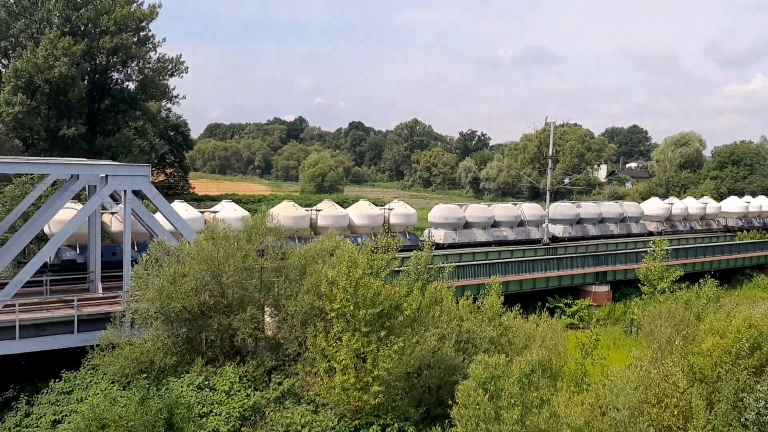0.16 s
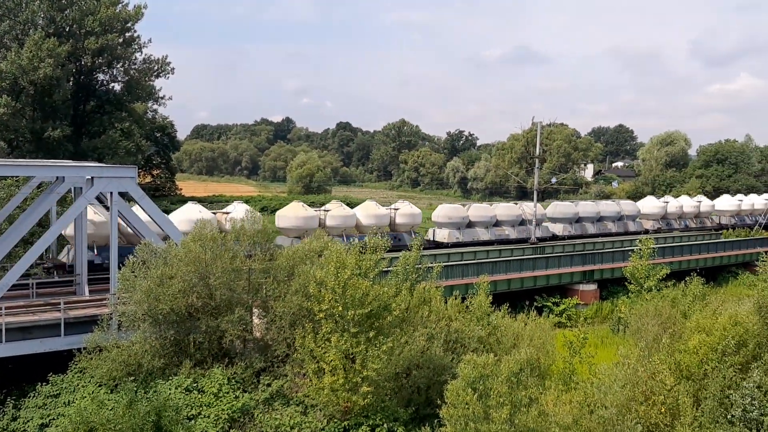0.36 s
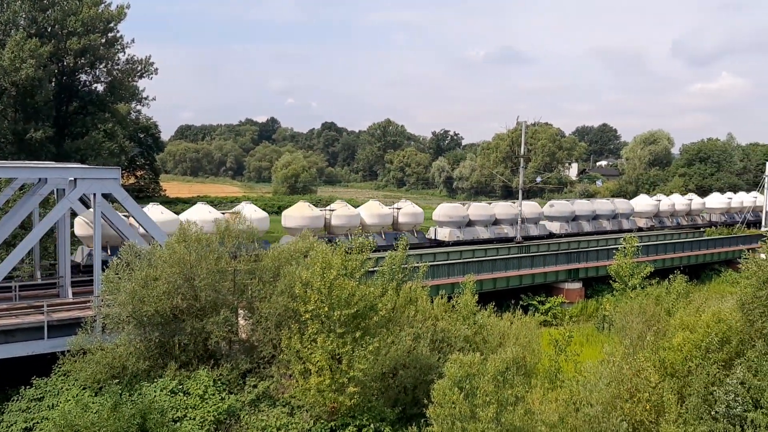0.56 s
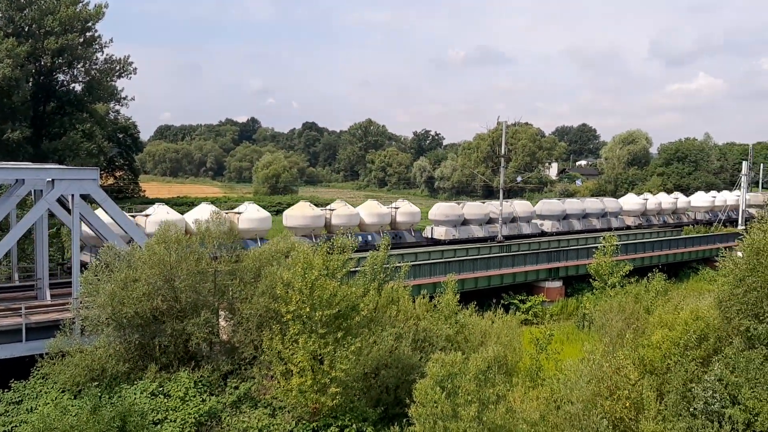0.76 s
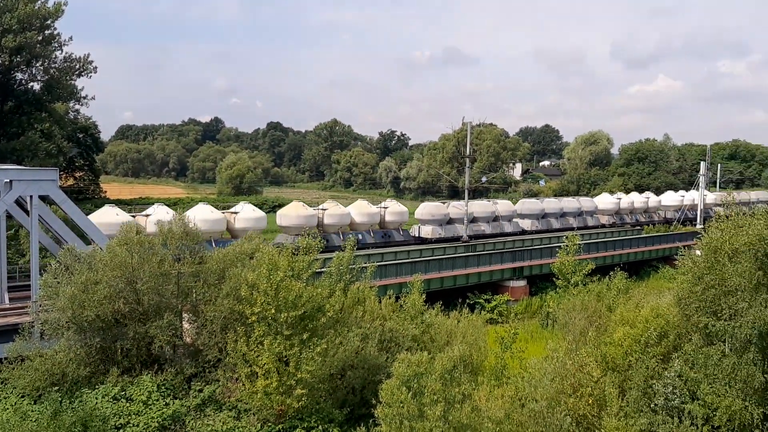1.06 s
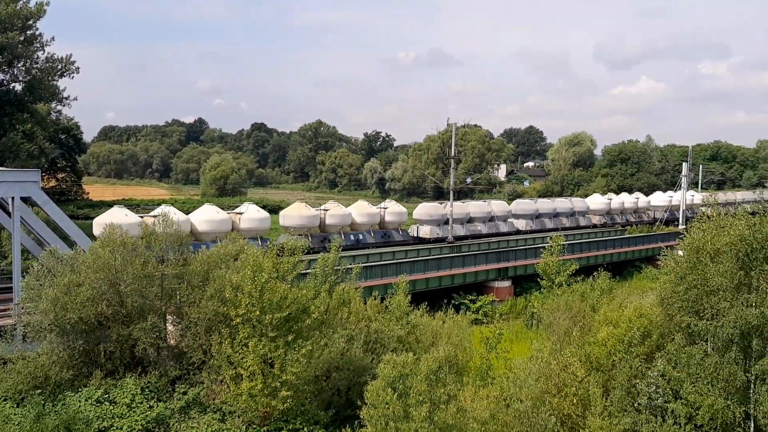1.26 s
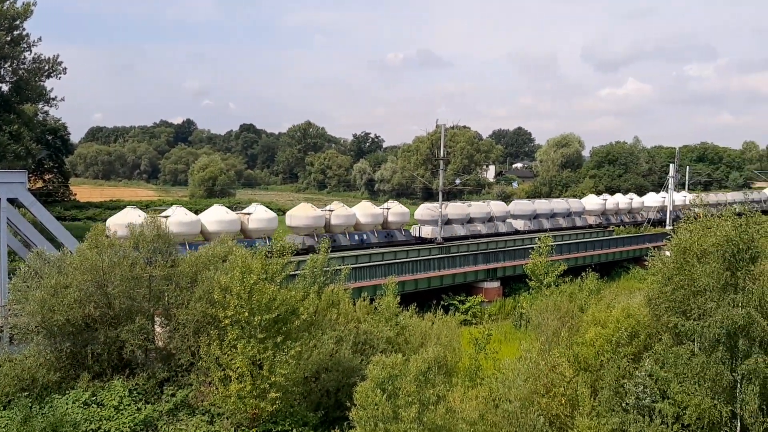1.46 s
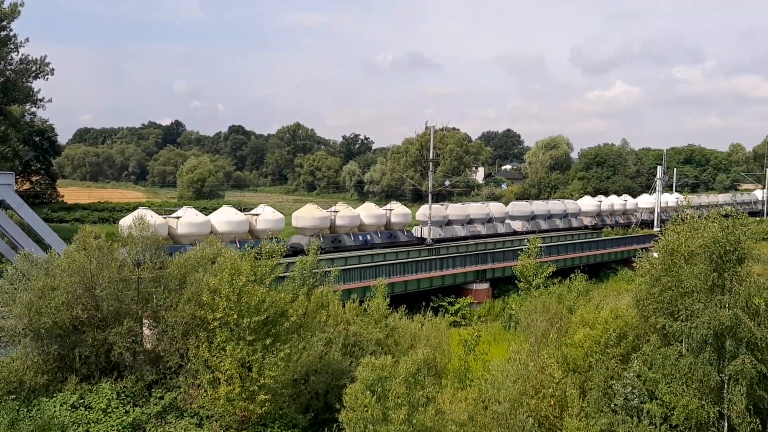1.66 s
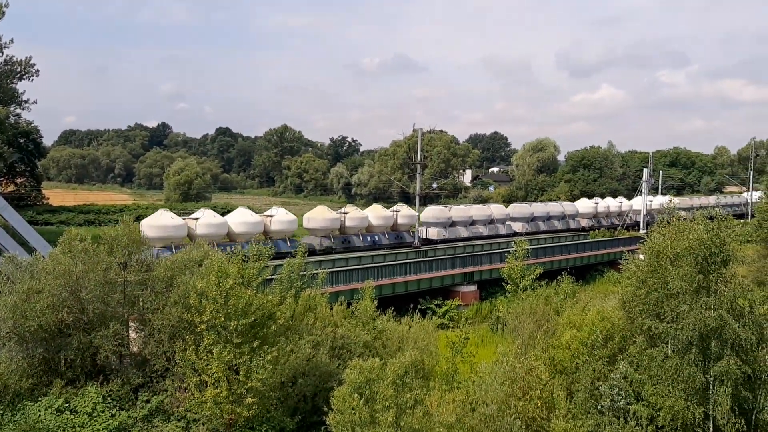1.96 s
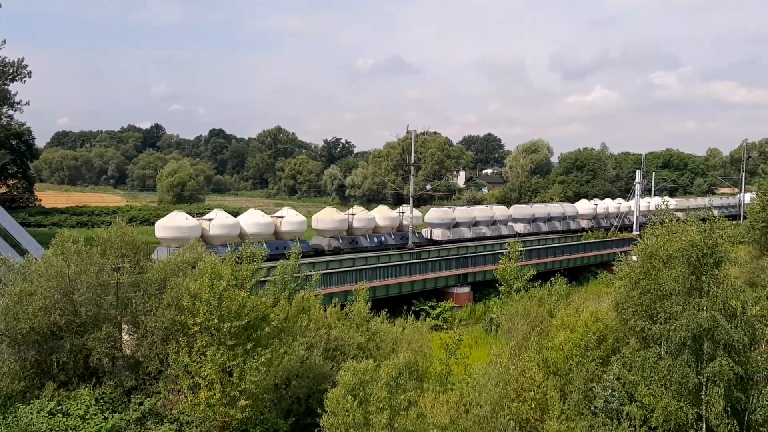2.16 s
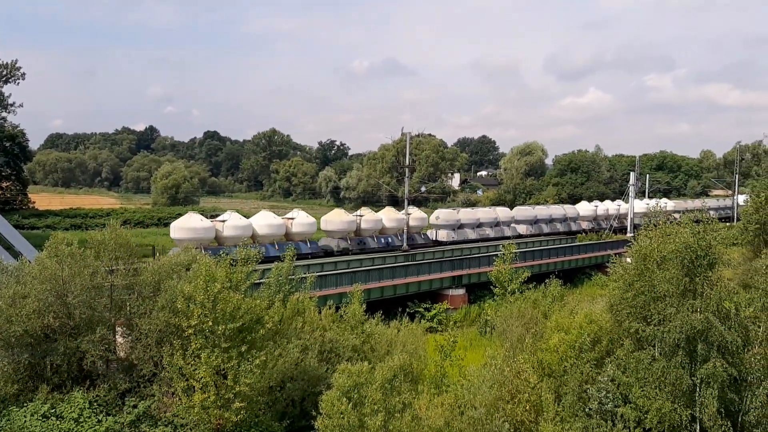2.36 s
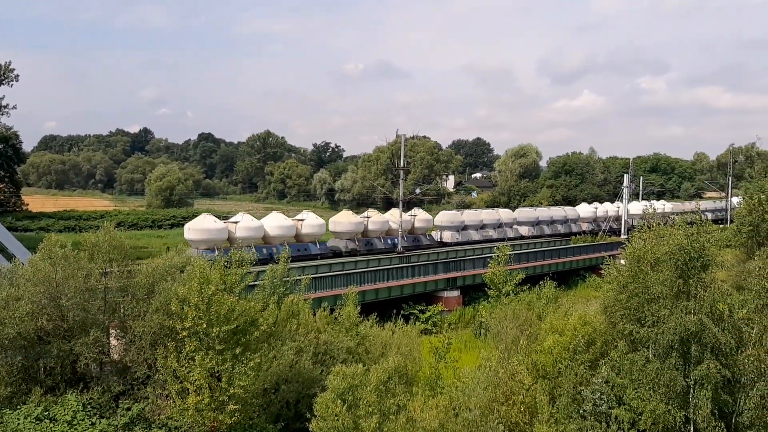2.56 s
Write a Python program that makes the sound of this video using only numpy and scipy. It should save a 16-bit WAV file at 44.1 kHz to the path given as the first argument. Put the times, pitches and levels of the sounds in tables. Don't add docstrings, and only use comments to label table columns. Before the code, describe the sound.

Freight train wheels squeal piercingly and steadily over low bridge drumming that fades as wagons recede

```python
import sys
import numpy as np
from scipy import signal
from scipy.fft import rfft, irfft, next_fast_len
from scipy.io import wavfile
from scipy.ndimage import uniform_filter1d, minimum_filter1d, map_coordinates

SR = 44100
rng = np.random.default_rng(int(sys.argv[2]) if len(sys.argv) > 2 else 0)


def amplitude_ratio(level_db):
    exponent = np.asarray(level_db, float) / 20
    return 10 ** exponent


def unload_audio(sound):
    columns = np.transpose(np.atleast_2d(sound))
    steps = np.round(np.clip(columns, -1, 1) * 32767)
    wavfile.write(sys.argv[1], SR, steps.astype(np.int16))


N = 119070

LAG_S = 0.000463
NEAR_PORT_DB = 5
WAVER_HZ = 4.6

# t/s, level/dB
BRIDGE_FADE = [(0, -27.5), (.45, -29), (.72, -31), (.92, -27), (1.15, -32.5), (2.0, -35.5), (2.7, -38.5)]
HALO_SHIFT = [-20, 18]


def unit(x):
    return x / np.sqrt(np.mean(x ** 2) + 1e-20)


def along(points, hz):
    f, v = np.transpose(points)
    return np.interp(np.log(hz + 1), np.log(f + 1), v)


def closed(points, hz):
    inside = (hz > 0.9 * points[0][0]) * (hz < 1.05 * points[-1][0])
    return amplitude_ratio(along(points, hz)) * inside


def peaks(modes, hz):
    power = sum(amplitude_ratio(2 * db) / (1 + (2 * (hz - centre) / width) ** 2) for centre, width, db in modes)
    return np.sqrt(1 + power)


def curves(rows):
    s, *cols = np.transpose(rows)
    return [np.interp(np.arange(N) / SR, s, c) for c in cols]


def wobble(rate):
    coarse = np.arange(0, N + 32, 32)
    knots = rng.standard_normal(600)
    return np.interp(np.arange(N), coarse, map_coordinates(knots, [coarse * min(rate, 200) / SR]))


def gate(start_s, length_s):
    t = np.arange(N) / SR
    return np.clip(np.minimum(t - start_s, start_s + length_s - t) / 0.05, 0, 1)


def filtered(x, response):
    m = next_fast_len(N + SR // 2)
    return irfft(rfft(x, m) * response(np.fft.rfftfreq(m, 1 / SR)), m)[..., :N]


def rush(gain, patchy_db, lag_s=LAG_S, alike=None):
    # f/Hz, likeness
    wheel_alike = [(60, 0.99), (300, 1), (600, 0.58), (1200, 0.62), (2700, 0.35), (4500, 0.25),
                   (8000, 0.15), (15000, 0.23)]
    # f/Hz, level/dB
    left_port = [(60, -2.3), (1800, -3), (3100, -5), (3500, -9), (4000, -3), (5700, -14), (7200, -5.5),
                 (15000, -3)]
    if alike is None:
        alike = wheel_alike

    z = signal.stft(rng.standard_normal((2, N)), nperseg=512)[2]
    patches = uniform_filter1d(rng.standard_normal(z.shape[1:]), size=4, axis=0)
    patches = unit(uniform_filter1d(patches, size=10, axis=1))
    pair = signal.istft(z * amplitude_ratio(patchy_db * patches), nperseg=512)[1][:, :N]

    def shared_and_opposed(hz):
        turn = np.arccos(np.clip(along(alike, hz), -1, 1)) / 2
        return gain(hz) * np.array([np.cos(turn), np.sin(turn)])

    def path_to_left(hz):
        return amplitude_ratio(along(left_port, hz)) * np.exp(-2j * np.pi * hz * lag_s)

    shared, opposed = filtered(pair, shared_and_opposed)
    both = np.array([filtered(shared + opposed, path_to_left), shared - opposed])
    return both / np.std(both.mean(axis=0))


def bridge():
    # f/Hz, level/dB per Hz
    girders = [(15, -68), (25, -24), (45, -21), (65, -3), (140, -2), (187, -1), (412, -3.5), (652, -8.5),
               (1100, -6.5), (1430, -18), (2420, -120)]
    # f/Hz, width/Hz, level/dB
    girder_modes = [(66, 16, 5.5), (128, 47, 5), (225, 23, 1), (442, 130, 3.5)]
    # f/Hz, likeness
    bridge_alike = [(60, 0.97), (300, 0.96), (500, 1), (750, -0.024), (1200, -0.85)]
    level_db, = curves(BRIDGE_FADE)
    drumming = rush(lambda hz: closed(girders, hz) * peaks(girder_modes, hz),
                    patchy_db=1.17, lag_s=-0.00018, alike=bridge_alike)
    return amplitude_ratio(level_db + 0.13 * wobble(5.5)) * drumming


def hums():
    # t/s, length/s, f/Hz, level/dB
    plates = [
        (0, 0.77, 63.5, -39.5),
        (-.05, 0.21, 135.5, -37),
        (0.072, 0.16, 223.7, -38),
        (0.323, .1, 108, -34),
        (0.754, 0.28, 65, -44),
        (.95, 0.34, 115.3, -39.5),
        (1.328, .12, 100, -36),
        (1.456, 0.19, 118, -37.5),
        (1.795, 0.11, 130, -38),
        (2.117, 0.31, 71.8, -44),
    ]
    drift_hz = 2.7 * wobble(9.18)
    notes = sum(amplitude_ratio(db) * gate(s, length_s) * np.sin(2 * np.pi * np.cumsum(hz + drift_hz) / SR)
                for s, length_s, hz, db in plates)
    return np.sqrt(2) * notes * amplitude_ratio([[-1.2], [1.2]])


def joints():
    # t/s, peak/dB, f/Hz
    knocks = [
        (0.023, -17, 412),
        (0.19, -17, 330),
        (0.279, -18, 445),
        (0.402, -10.5, 390),
        (0.627, -15.5, 424),
        (0.764, -17, 377),
        (0.888, -33, 294),
        (1.029, -20, 269),
    ]
    knock_db, t60_s, rise_s = -3.5, 0.075, 0.0042
    out = np.zeros(N + SR)
    t = np.arange(SR // 4) / SR
    for s, db, hz in knocks:
        decay = amplitude_ratio(db + knock_db - 60 * t / t60_s)
        ring = decay * (1 - np.exp(-t / rise_s)) * np.sin(2 * np.pi * hz * t)
        out[round(s * SR):][:len(t)] += ring
    return out[:N] * amplitude_ratio([[-1.2], [1.2]])


def rolling():
    # t/s, level/dB
    wheel_roll = [(0.0, -37), (0.5, -37), (0.55, -32.5), (0.71, -38.5), (1.01, -37), (1.82, -35.5),
                  (1.92, -39), (2.33, -37.5), (2.7, -40)]
    # f/Hz, level/dB per Hz
    rail_spectrum = [(500, -23.5), (900, -10.5), (1300, 0), (1800, -7), (3000, -6), (3500, -6.5),
                     (3900, -2.5), (4500, 1.5)]
    # f/Hz, width/Hz, level/dB
    wheel_discs = [(907, 154, 3.5), (1511, 87, 8.5), (2021, 170, 8), (2565, 280, 8.5), (3225, 220, 2.5)]
    # t/s, spread/s, extra level/dB
    disc_swells = [(0.84, 0.37, 6.5), (1.25, 0.31, 6), (2.46, 0.52, 3), (2.5, 1, 4.5), (2.54, 0.37, 6.5)]
    rail_db, rail_follows = -37.5, 0.35
    (level_db,), (bridge_db,) = curves(wheel_roll), curves(BRIDGE_FADE)
    t = np.arange(N) / SR

    discs = 0
    for (centre, width, db), (s, spread_s, more_db) in zip(wheel_discs, disc_swells):
        swell = amplitude_ratio(db + more_db * np.exp(-((t - s) / spread_s) ** 2))
        ring = rush(lambda hz: 1 / (1 + (2 * (hz - centre) / width) ** 2) ** 0.71, patchy_db=1.5)
        discs = discs + swell * np.sqrt(width) * ring
    discs = discs / np.std(discs.mean(axis=0))
    rail = rush(lambda hz: closed(rail_spectrum, hz), patchy_db=1.5)
    rail_level_db = rail_db + rail_follows * (bridge_db - bridge_db.mean())
    return amplitude_ratio(level_db) * discs + amplitude_ratio(rail_level_db) * rail


def flanges():
    # t/s, level/dB
    scraping = [(0.0, -39.5), (0.31, -40), (0.33, -37), (0.41, -40), (0.66, -37.5), (0.79, -44),
                (1.14, -34), (1.18, -36.5), (1.9, -38), (1.98, -34), (2.2, -38), (2.27, -35), (2.68, -37),
                (2.7, -38)]
    # f/Hz, level/dB per Hz
    scrape_spectrum = [(3060, -16.5), (5200, 0), (5570, -6.5), (6040, -4.5), (6450, -9), (7300, -9),
                       (7760, -16), (8570, -36.5), (8800, -42), (11400, -73), (19400, -120)]
    # f/Hz, level/dB per Hz
    air_spectrum = [(5060, -37), (8600, -20), (9330, 2.5), (10200, -5.5), (11300, 0.5), (11900, 5),
                    (12900, -8), (14200, -3), (15800, -18)]
    air_base_db, air_follows, air_wobble_db = -55, 0.2, 0.25
    level_db, = curves(scraping)
    scrape = amplitude_ratio(level_db + 3.0) * rush(lambda hz: closed(scrape_spectrum, hz), patchy_db=2.5)

    air_db = air_base_db + air_follows * (level_db - level_db.mean()) + air_wobble_db * wobble(22)
    air = rush(lambda hz: closed(air_spectrum, hz), patchy_db=0.6)
    top = filtered(air, lambda hz: 1 / (1 + (13500 / (hz + 1)) ** 12))
    tilt_db = 1.5 * (np.arange(N) - N / 2) / SR
    return scrape + amplitude_ratio(air_db) * (amplitude_ratio(tilt_db) * (air - top) + amplitude_ratio(-tilt_db) * top)


def tone(pitch_hz, level_db, left_db, waver_hz=WAVER_HZ):
    octave_db = -55.5
    phase = 2 * np.pi * np.cumsum(pitch_hz + waver_hz * wobble(40)) / SR
    flutter_db = level_db + NEAR_PORT_DB + 0.5 * wobble(49)
    left = amplitude_ratio(left_db + 2.6 * wobble(24.4)) * np.sin(phase + 1.34 * wobble(15))
    ports = np.array([left, np.sin(phase)]) + amplitude_ratio(octave_db) * np.sin(2 * phase)
    return np.sqrt(2) * amplitude_ratio(flutter_db) * ports


def singers():
    # t/s, length/s, f/Hz, glide/Hz per s
    catches = [(-.07, .3, 4092, -40), (.19, .15, 4085, 0), (.32, .11, 4085, 0), (.41, .21, 4088, -60),
               (.6, .12, 4088, 0), (.47, .17, 3115, -150), (.29, .13, 6160, 0), (1.0, .4, 2650, 60),
               (1.18, .1, 5290, 0), (1.33, .33, 4545, 0), (1.67, .16, 3350, -60), (2.2, .2, 5818, 0),
               (2.36, .4, 4535, -50), (2.425, .2, 4075, -150), (1.27, .25, 4080, 0), (.1, .12, 3120, 0),
               (1.9, .14, 4535, 0), (1.4, .14, 4685, 0), (2.1, .1, 4690, 0), (.5, .13, 3190, -500),
               (.52, .1, 2560, 0), (1.72, .14, 2600, 0), (2.2, .3, 2620, -100)]
    # level/dB, left port/dB
    strengths = [(-41.5, -2), (-41, -2), (-43, -2), (-40.5, -2), (-45, -2), (-47, -1), (-47, -12),
                 (-50, -1), (-41, -12), (-32, -11), (-45, -8), (-46, -18), (-34, -11), (-40, -4), (-46, -3),
                 (-50, -2), (-35, -11), (-29, -20), (-28, -20), (-49, -1), (-46, -2), (-45, -2), (-47, -2)]
    t = np.arange(N) / SR
    out = 0
    for (s, length_s, hz, glide), (db, left_db) in zip(catches, strengths):
        pitch_hz = hz + glide * np.clip(t - s, 0, length_s)
        unsteady = amplitude_ratio(3 * wobble(29.34))
        out = out + gate(s, length_s) * unsteady * tone(pitch_hz, db, left_db, waver_hz=6)
    return out


def squeal(rows, pitch, voice, shift_hz):
    # f/Hz, level/dB
    left_shadow = [(4000, -4), (4400, -7), (4550, -12), (4700, -16), (4900, -12), (5100, -11), (5600, -14)]
    halo_width_hz, swell_db_per_s = 107, 190
    (pitch_hz,), (tone_db, halo_db) = curves(pitch), curves(rows)
    skirt_hz, skirt_db, left_db, halo_left_db = voice
    t = np.arange(N) / SR
    before_db = -swell_db_per_s * np.clip(rows[0][0] - t, 0, None)

    def slip_spectrum(hz):
        return 1 / (1 + (hz / halo_width_hz) ** 4) + amplitude_ratio(skirt_db) / (1 + (hz / skirt_hz) ** 2)

    slip = filtered(rng.standard_normal((4, N)), slip_spectrum)
    slip = slip / np.std(slip)
    phase = 2 * np.pi * (np.mean(pitch_hz) + shift_hz) * t
    right, other = slip[:2] * np.cos(phase) + slip[2:] * np.sin(phase)
    late = np.roll(right, round(LAG_S * SR))
    left = filtered(unit(0.13 * late + other), lambda hz: amplitude_ratio(along(left_shadow, hz)))
    halo = np.array([amplitude_ratio(halo_left_db) * left, right])
    halo = halo * amplitude_ratio(halo_db + NEAR_PORT_DB + 0.29 * wobble(14))
    return amplitude_ratio(before_db) * (tone(pitch_hz, tone_db, left_db) + halo)


def low_wheel():
    # t/s, tone level/dB, halo level/dB
    early = [(0.0, -34, -22.5), (0.13, -19.5, -24.5), (0.27, -20, -25.5), (0.34, -27.5, -22),
             (0.42, -22, -23), (0.49, -21, -21), (0.53, -30, -24), (0.59, -19.5, -21.5), (0.65, -33, -24),
             (0.69, -17.5, -23), (0.78, -26.5, -25.5), (0.92, -33, -25), (1.0, -44, -22.5)]
    late = [(1.72, -34, -24), (1.9, -28, -24.5), (2.0, -29, -23.5), (2.36, -40, -26), (2.44, -22.5, -25.5),
            (2.6, -20, -28), (2.7, -35, -20.5)]
    # t/s, f/Hz
    low_pitch = [(0, 4692), (.1, 4686), (.9, 4682), (1.7, 4674), (2.45, 4668), (2.7, 4664)]
    low_voice = (376, -12.5, -33, -3)
    return squeal(early + late, low_pitch, low_voice, HALO_SHIFT[0])


def high_wheel():
    # t/s, tone level/dB, halo level/dB
    high_rows = [(0.92, -26.5, -35), (1.04, -26, -25), (1.1, -15.5, -25.5), (1.145, -22.5, -17.5),
                 (1.168, -47, -32), (1.2, -16.5, -20), (1.3, -27.5, -22), (1.37, -23, -24),
                 (1.55, -28.5, -23.5), (1.72, -23, -18), (1.86, -17, -23), (2.01, -33.5, -22),
                 (2.06, -20, -23), (2.13, -17, -20.5), (2.17, -28, -21), (2.27, -17.5, -20.5),
                 (2.44, -18.5, -23.5), (2.49, -30.5, -24.5)]
    # t/s, f/Hz
    high_pitch = [(.93, 4832), (1.1, 4826), (1.25, 4830), (1.4, 4816), (1.7, 4814), (1.9, 4802),
                  (2.14, 4800), (2.21, 4822), (2.3, 4797), (2.45, 4810), (2.7, 4800)]
    high_voice = (330, -19, -24, 3)
    return squeal(high_rows, high_pitch, high_voice, HALO_SHIFT[1])


def scene():
    background = bridge() + hums() + joints() + rolling() + flanges()
    return background + singers() + low_wheel() + high_wheel()


def band_limit(x):
    return signal.sosfilt(signal.butter(12, 16030, fs=SR, output="sos"), x)


def record(dry):
    ceiling, hold = 0.97, round(0.004 * SR)
    need = np.minimum(1, ceiling / (np.abs(dry).max(axis=0) + 1e-9))
    held = dry * uniform_filter1d(minimum_filter1d(need, size=2 * hold), size=hold)
    mix = filtered(held, lambda hz: hz < 15730)
    return band_limit(mix)


dry = scene()
out = record(dry)
unload_audio(out)
```